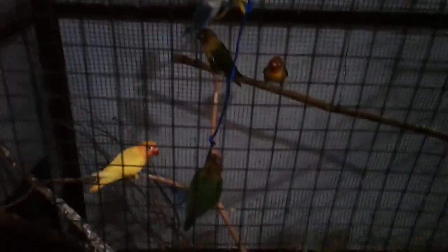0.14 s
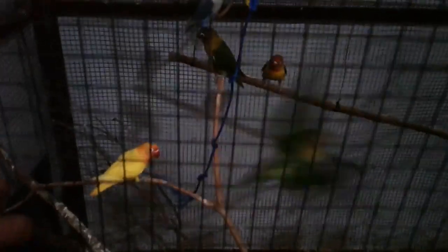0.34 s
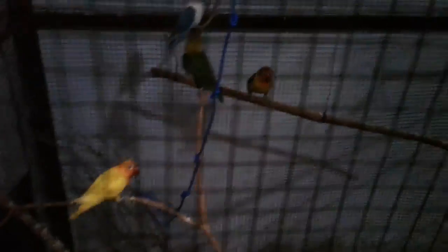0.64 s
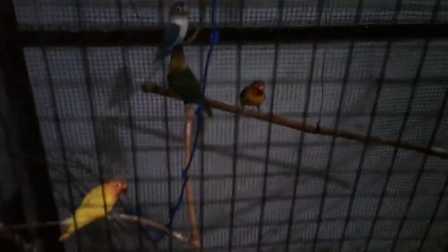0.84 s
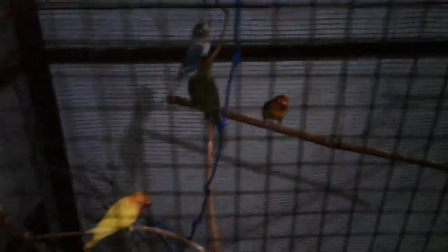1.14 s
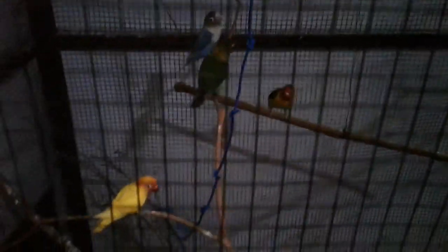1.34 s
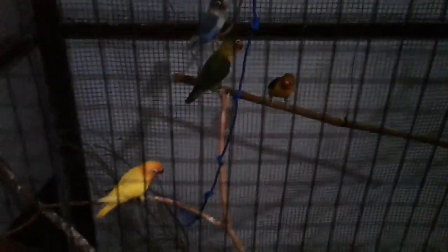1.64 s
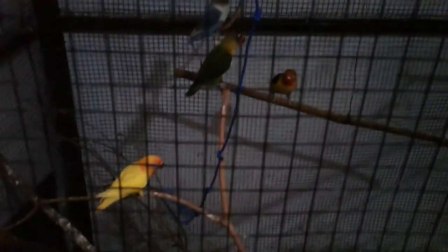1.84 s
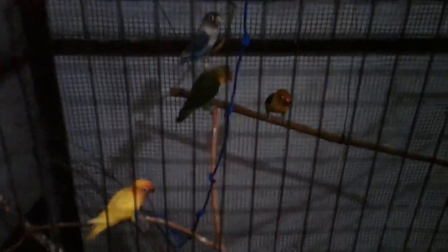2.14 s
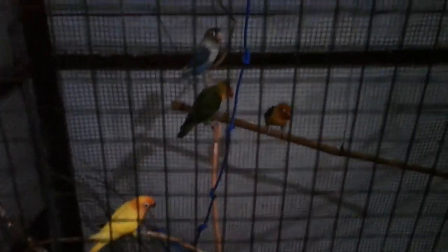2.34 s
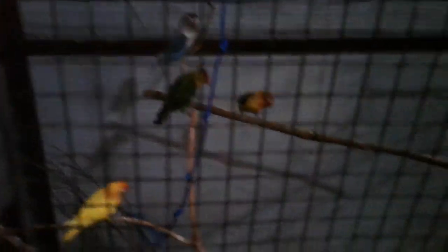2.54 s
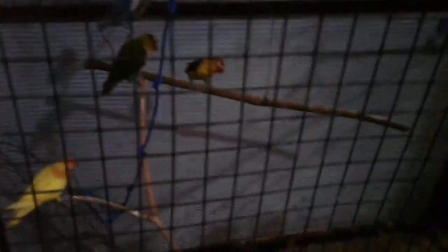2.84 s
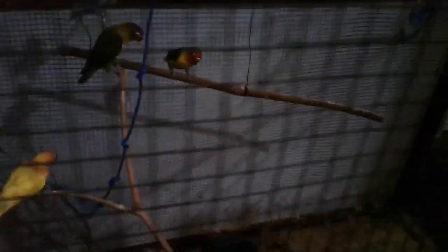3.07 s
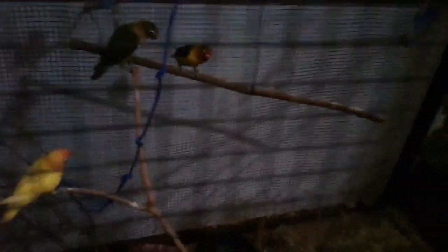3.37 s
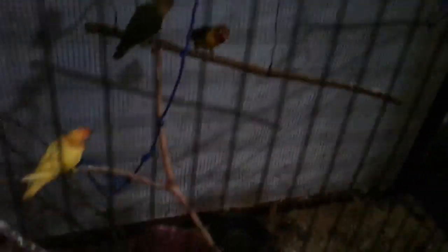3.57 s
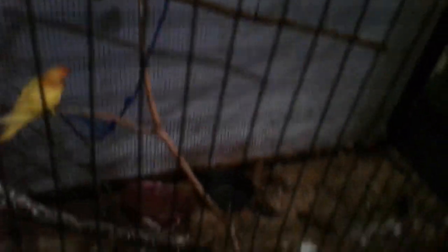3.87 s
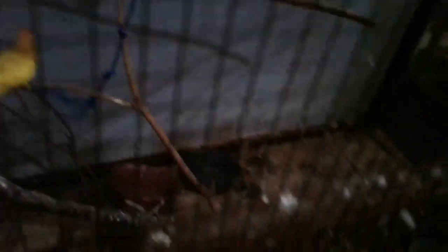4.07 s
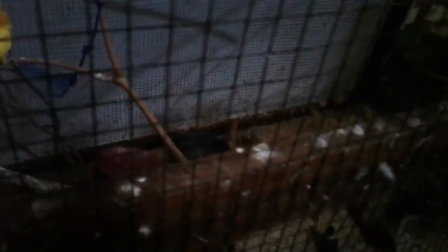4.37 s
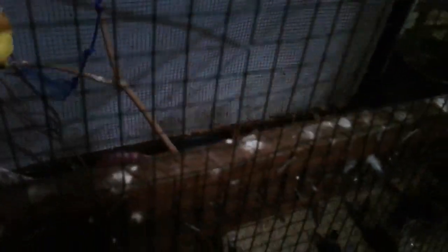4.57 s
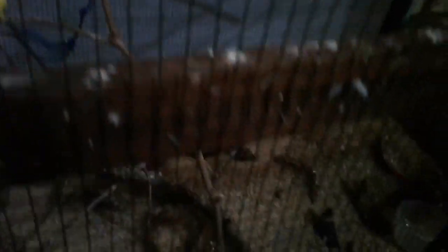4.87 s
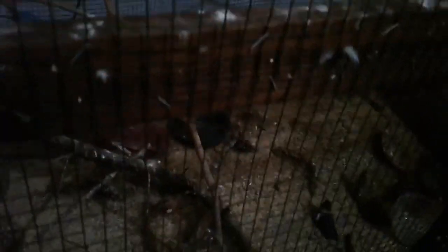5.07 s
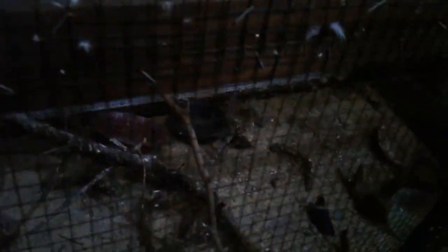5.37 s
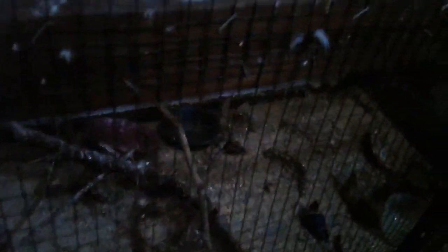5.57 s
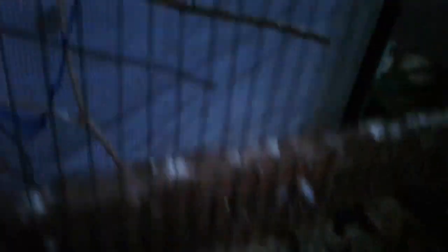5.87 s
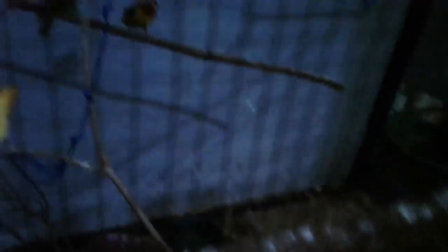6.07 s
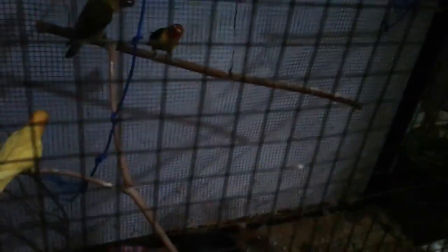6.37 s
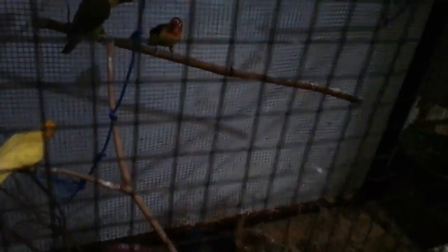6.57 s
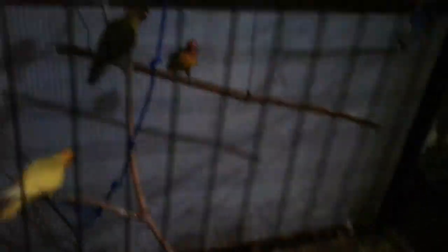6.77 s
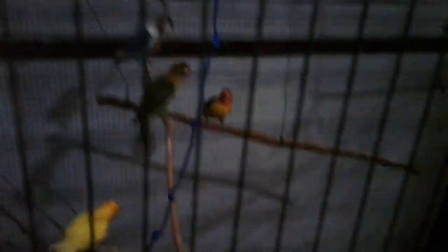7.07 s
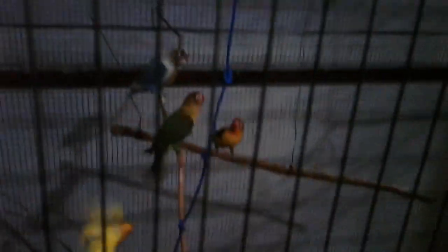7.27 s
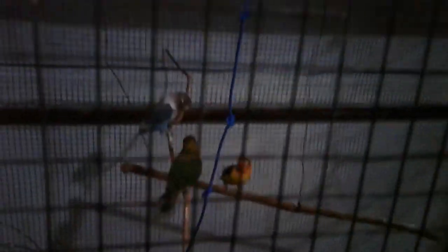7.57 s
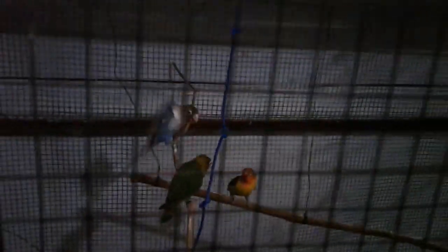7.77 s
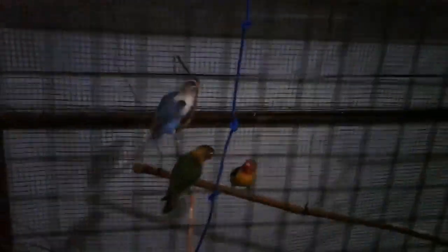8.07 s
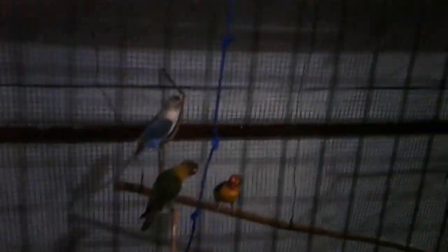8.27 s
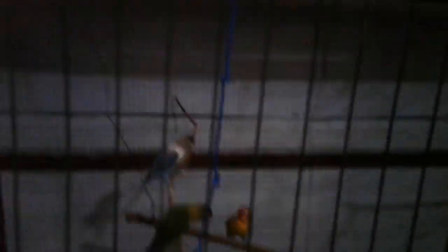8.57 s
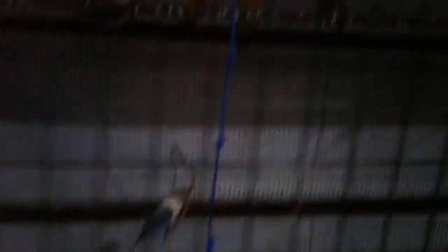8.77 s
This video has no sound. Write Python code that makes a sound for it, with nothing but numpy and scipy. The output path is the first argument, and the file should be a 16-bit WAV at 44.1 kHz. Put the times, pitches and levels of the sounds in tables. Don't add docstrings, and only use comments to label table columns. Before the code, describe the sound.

A few small parrots call a few metres from a phone in a bare-walled aviary that rings for about half a second. From 0 to 0.2 s come quick whistles and rasps, then faint far whistles; a second brief bout at 0.7-1.0 s overlaps a short wing flutter. Feet land on ringing wire around 1.3 s, with a light tick after, and one explosive squawk snaps at 1.8 s. A faint distant motor note sinks until 2.7 s over soft air and low rumble, while far birds squawk at 2.3-2.6 s. Piercing, buzzy high chirps follow from 2.4 to 5.4 s, singly or in close pairs. Two harsh climbing screeches sound at 5.7 and 6.15 s amid fast wingbeats. Chatter breaks out at 6.65-7.0 s, then runs densely from 7.2 s to the end near 9 s, gliding whistles and rasps tumbling together, with the strongest wing flapping around 8 s. Loud calls distort slightly.

```python
import sys
import numpy as np
from scipy import signal
from scipy.fft import rfft, irfft
from scipy.io import wavfile
from scipy.ndimage import uniform_filter1d, map_coordinates

SR = 44100
rng = np.random.default_rng(int(sys.argv[2]) if len(sys.argv) > 2 else 0)


def gain_from_decibels(decibels):
    exponent = np.asarray(decibels, float) / 20
    return 10 ** exponent


def to_wav(s):
    ch = np.atleast_2d(s).T
    pcm = np.round(np.clip(ch, -1, 1) * 32767)
    wavfile.write(sys.argv[1], SR, pcm.astype(np.int16))


N = 392931

# frequency in Hz, level in dB per Hz.
AIR_HZ_DB = [(40, -7.5), (200, -5), (500, -4.5), (1000, -6.5), (6000, -12), (7200, -35), (16000, -30)]
# time in seconds, level in dB.
RUMBLE_S_DB = [(0.0, -81), (0.59, -62), (2.2, -62), (2.7, -57), (3.6, -65), (5.2, -61), (5.6, -64),
               (7.58, -64.5), (8.01, -53.5), (8.4, -69), (8.9, -85)]
# time in seconds, pitch in Hz, level in dB.
MOTOR_S_HZ_DB = [
    (1.79, 440, -84),
    (1.82, 440, -68),
    (2.42, 395, -70),
    (2.75, 350, -84),
]
# frequency in Hz, 60 dB decay time in seconds.
ROOM_T60_HZ_S = [(500, 0.63), (3000, 0.43), (6000, 0.44), (12000, 0.3)]
# time in seconds, peak level in dB, ring in Hz.
LANDINGS = [
    (1.261, -32, 338),
    (1.271, -29, 293),
    (1.289, -30, 369),
    (1.39, -33, 1062),
    (1.573, -38, 346),
    (2.257, -36.5, 1173),
]
# frequency in Hz, level in dB per Hz.
RATTLE_HZ_DB = [(100, -22.5), (350, -12), (900, -6), (2500, -7), (5000, -18), (14000, -29)]
# start in seconds, end in seconds, beats per second, level in dB.
FLIGHTS = [
    (0.46, 1.004, 19.4, -55),
    (5.065, 5.327, 16.2, -60.5),
    (5.778, 6.38, 24, -54),
    (6.454, 6.592, 26, -53.5),
    (7.73, 8.2, 16, -47),
]
# frequency in Hz, level in dB per Hz.
WING_HZ_DB = [(40, -8.5), (110, -4), (300, -11.5), (600, -21.5), (1500, -24)]

# frequency in Hz, level in dB.
BEAK_HZ_DB = [(1700, -45.5), (2400, -5.5), (3500, 7), (6300, 1), (7300, -2.5), (10200, -15), (12300, -9),
              (16000, -20)]
# loudest partial in Hz, octave below in dB.
WINDPIPE_HZ_DB = [(3600, -30.5), (4600, -35), (5500, -15), (6200, -10.5)]
# warble in Hz, warble share of pitch, wander share of pitch, throb depth 0-1.
CLEAR = (150, .005, .009, .33)
HARSH = (250, .028, .036, .8)
BUZZY = (225, .017, .011, .75)
PURE_DB, FULL_DB, THIN_DB, RICH_DB, FAR_LOW_DB = -47.5, -13.5, -7.5, -9.5, 4

# start in seconds, length in seconds, from Hz, to Hz, level in dB.
FAR_SQUAWKS = [(2.327, 0.089, 6060, 5190, -40), (2.328, 0.11, 3900, 4210, -38.5),
               (2.33, 0.1, 4910, 5200, -41), (2.335, .075, 6760, 6500, -45.5),
               (2.47, 0.09, 5810, 5710, -40), (2.45, .08, 4330, 4470, -42.5),
               (2.52, 0.078, 3850, 4205, -36), (2.55, .075, 4550, 5030, -35),
               (2.58, 0.063, 5924, 5400, -41.5)]
FAR_FULL = [(.228, 0.2, 6010, 5650, -39), (.505, 0.069, 5865, 5590, -35), (2.348, 0.084, 5770, 5300, -43.5)]
FAR_PURE = [(2.154, 0.031, 6150, 5050, -49.5), (2.172, 0.056, 5200, 5600, -49.5),
            (.235, 0.22, 8850, 8550, -48)]
FAR_LOW = [(2.345, 0.078, 5600, 5230, -43), (2.45, 0.068, 6220, 5770, -50),
           (2.51, 0.078, 5480, 5275, -43.5)]

# start in seconds, from Hz, to Hz, level in dB, octave below in dB.
CHIRPS = [(2.409, 6270, 6210, -19, -1), (2.9762, 6477, 6230, -11, -5.5), (3.4554, 6530, 6090, -11, -10.5),
          (3.5617, 6680, 6075, -15, -4), (4.016, 6240, 6454, -13, -8.5), (4.1722, 5810, 6436, -13.5, -4.5),
          (4.7292, 6585, 6120, -12.5, -5.5), (4.867, 5800, 6090, -11, -11.5),
          (5.4066, 5803, 6077, -10, -13.5)]
# start in seconds, pitch in Hz, level in dB.
UNDERTONES = [(2.417, 5320, -20.5), (2.99, 5744, -17.5), (3.471, 5734, -13), (3.578, 5520, -15),
              (4.028, 5650, -21.5), (4.741, 5646, -14), (5.408, 5230, -18.5)]
# start in seconds, pitch in Hz, level in dB.
LEAD_INS = [(0.091, 3910, -24), (0.744, 4140, -18), (7.204, 4010, -22), (7.483, 3220, -26),
            (7.597, 3216, -25), (8.242, 3570, -19.5), (8.418, 3316, -24.5), (8.542, 3254, -19.5),
            (8.658, 3136, -21.5), (8.785, 3270, -20)]
# start in seconds, pitch factor, time stretch, level in dB.
SCREECHES = [
    (5.695, 1.01, .99, -14),
    (6.147, .98, 1.03, -14),
]
# delay in seconds, length in seconds, from Hz, to Hz, level in dB.
SCREECH_THIN = [
    (0.0, .045, 3227, 4463, -9.5),
]
SCREECH_FULL = [
    (.05, 0.022, 4520, 4774, -1.6),
    (.072, 0.0298, 4783, 4954, 0.52),
]
SCREECH_HARSH = [
    (.05, 0.0145, 3270, 3480, -11.5),
    (.09, .06, 5134, 5627, 0.4),
    (.1, 0.049, 3250, 3513, -23),
    (.105, 0.033, 6284, 6520, -6.5),
    (.142, .02, 5900, 5800, -0.5),
    (.155, 0.01, 3630, 3624, -8),
]
# start in seconds, length in seconds, from Hz, to Hz, level in dB.
SCREECH_ASIDES = [(5.729, 0.015, 4334, 4560, -13.5), (5.742, .014, 3200, 3470, -19),
                  (5.845, 0.019, 4550, 4300, -14), (5.765, 0.067, 3560, 3300, -26.5),
                  (6.158, .026, 5900, 6250, -27.5), (6.184, .012, 5150, 5500, -12.5),
                  (6.234, 0.0084, 5200, 5400, -17), (6.154, 0.032, 3400, 4250, -22),
                  (6.245, .052, 4950, 5550, -15), (6.21, .008, 5200, 5300, -15),
                  (6.304, 0.019, 4300, 4450, -20.5), (6.31, 0.017, 3400, 3800, -23)]
# start in seconds, length in seconds, pitch in Hz, level in dB.
RASPS = [(0.0, 0.011, 6090, -14), (.15, .022, 4820, -13.5), (.76, 0.03, 6610, -25), (4.218, .05, 5715, -12),
         (6.689, 0.012, 4170, -22.5), (6.703, 0.028, 5250, -13), (2.415, .028, 5810, -17),
         (5.408, 0.027, 5010, -21), (6.803, 0.0383, 3203, -17), (7.206, 0.019, 5940, -20.5),
         (7.214, 0.017, 6260, -15.5), (7.226, 0.01, 3330, -22), (7.318, 0.0185, 4390, -17),
         (7.344, 0.016, 5480, -19.5), (7.392, 0.019, 5940, -18), (7.41, 0.0189, 4866, -9),
         (7.507, 0.0082, 3290, -17), (7.638, 0.0052, 2956, -17.5), (7.826, 0.0137, 6870, -17.5),
         (7.826, 0.006, 5280, -14), (7.888, 0.02, 6150, -18), (7.988, 0.01, 6250, -12),
         (8.006, 0.018, 6400, -12.5), (8.028, 0.032, 4630, -20.5), (8.066, 0.025, 5160, -18),
         (8.158, 0.0099, 3600, -15), (8.255, 0.019, 3220, -22), (8.357, 0.034, 4780, -21),
         (8.45, .01, 5590, -18.5), (8.798, 0.027, 4950, -21), (8.825, 0.014, 4196, -15.5)]
# start in seconds, length in seconds, from Hz, to Hz, level in dB.
SQUAWKS = [(0.854, 0.027, 4960, 3296, -21.5), (1.778, 0.0052, 7220, 4343, -7.5),
           (2.411, 0.0055, 7130, 6500, -18), (4.171, 0.012, 5250, 5710, -16),
           (4.854, 0.016, 4650, 5980, -12.5), (5.403, 0.0094, 5000, 6660, -18),
           (0.801, 0.012, 6950, 6100, -25), (3.558, .006, 5160, 7220, -17),
           (4.219, 0.0087, 4800, 6300, -13), (6.691, 0.021, 4540, 5280, -11),
           (6.764, 0.037, 4656, 3300, -13.5), (6.803, 0.054, 6400, 5856, -14),
           (6.831, .022, 4586, 5196, -11.5), (6.876, 0.012, 5746, 6400, -16),
           (7.201, 0.05, 4166, 6240, -19.5), (7.379, 0.0103, 3960, 4300, -15.5),
           (7.384, 0.011, 4150, 6330, -16), (7.49, 0.0159, 2403, 3520, -30.5),
           (7.527, 0.0089, 3000, 6870, -15), (7.884, 0.0255, 5295, 4915, -11.5),
           (7.986, 0.022, 4376, 5590, -7), (8.477, 0.0133, 5336, 6580, -12.5),
           (8.568, 0.0057, 3430, 5640, -6.5), (8.593, .034, 5660, 7160, -15),
           (8.68, 0.023, 3805, 3983, -15), (8.717, 0.0099, 4920, 6340, -11.5),
           (8.729, 0.007, 6140, 5920, -13), (8.847, 0.02, 5580, 6055, -16.5)]
# start in seconds, length in seconds, pitch in Hz, level in dB.
PURE_HOLDS = [(.03, 0.026, 2604, -25.5), (.138, 0.026, 3147, -21), (.827, 0.024, 3723, -14.5),
              (.778, 0.026, 2746, -21.5), (5.325, .016, 6090, -31.5), (6.884, 0.014, 6480, -17),
              (.962, 0.0084, 4266, -11.5), (.968, 0.015, 3056, -21.5), (.978, 0.017, 5067, -8.5),
              (6.947, 0.0224, 3480, -19.5), (6.971, 0.0063, 3390, -12), (6.98, 0.0075, 3380, -18),
              (7.236, .028, 4220, -8.5), (7.266, 0.017, 6690, -19), (7.362, 0.0286, 3604, -16),
              (7.8, .038, 3100, -25), (8.402, .008, 5450, -11), (8.409, 0.017, 4810, -11),
              (8.472, 0.043, 2990, -34), (8.574, 0.032, 3050, -20), (8.778, .01, 2990, -26.5),
              (8.383, 0.019, 2057, -29), (7.432, 0.016, 4904, -13.5), (7.641, 0.0084, 4850, -7.5),
              (7.65, 0.0093, 5130, -8), (7.771, 0.006, 5440, -8), (8.158, 0.023, 4150, -13.5),
              (8.27, .015, 3750, -15), (8.318, 0.0078, 3770, -8.5), (8.333, 0.025, 3554, -11),
              (8.368, 0.0305, 3650, -19), (8.552, 0.0087, 4530, -16.5), (8.579, 0.018, 4040, -15.5),
              (8.668, 0.0077, 5770, -10), (8.755, 0.02, 4200, -11)]
RICH_HOLDS = [(.782, .028, 5310, -27), (4.82, 0.036, 6150, -9.5), (5.323, .016, 4027, -27),
              (6.755, 0.021, 5036, -13), (7.615, 0.021, 4040, -23.5), (7.804, 0.0197, 6250, -8.5),
              (8.286, 0.0076, 5670, -11), (8.47, 0.036, 5990, -22.5), (8.598, 0.019, 6250, -21),
              (8.712, 0.02, 5860, -20), (8.845, 0.016, 5740, -15.5)]
FULL_HOLDS = [(.1, 0.052, 5850, -29.5), (.719, 0.044, 6080, -37.5), (.95, 0.017, 5850, -20.5),
              (6.674, 0.0223, 4510, -13.5), (6.722, 0.043, 4817, -12), (6.793, 0.011, 6220, -16),
              (7.777, 0.013, 6470, -13), (8.13, 0.02, 5264, -11), (8.146, 0.014, 6290, -11.5),
              (8.258, 0.025, 4644, -17.5), (8.292, 0.016, 4830, -8.5), (8.562, 0.0092, 6770, -12),
              (8.776, 0.005, 6050, -19)]
# start in seconds, length in seconds, from Hz, to Hz, level in dB.
PURE_GLIDES = [(.006, 0.028, 4143, 3760, -13), (0.104, 0.041, 3346, 3800, -20.5),
               (0.154, .006, 3150, 4810, -19.5), (0.817, 0.012, 4900, 3890, -14),
               (0.851, 0.012, 5870, 5500, -17.5), (0.94, 0.024, 3650, 4430, -18.5),
               (3.565, 0.0097, 4010, 3300, -20), (4.728, 0.0068, 4540, 3380, -17.5),
               (6.657, 0.018, 3423, 3980, -23.5), (6.864, 0.013, 5300, 5850, -7),
               (6.779, .007, 4370, 4000, -13), (6.79, .009, 4100, 3400, -18),
               (7.853, .026, 6504, 6570, -10.5), (6.937, 0.0092, 1710, 3430, -28.5),
               (7.263, 0.008, 4460, 6860, -7), (7.278, 0.038, 6750, 4210, -9),
               (7.319, 0.012, 3930, 2030, -25.5), (7.35, 0.0138, 2870, 3470, -20.5),
               (7.389, 0.0213, 3510, 3004, -20), (7.514, 0.0195, 4440, 3980, -14),
               (7.535, 0.017, 4720, 5344, -9.5), (7.61, 0.0103, 2140, 3360, -25.5),
               (7.841, 0.018, 5540, 3280, -12), (7.879, .007, 4010, 5600, -8),
               (7.885, .012, 5460, 5200, -8.5), (7.956, 0.04, 3850, 4225, -14),
               (8.038, 0.034, 3805, 3445, -13.5), (8.1, 0.012, 3590, 3420, -17),
               (8.116, .014, 4210, 4045, -10), (8.179, 0.009, 4710, 5020, -6.5),
               (8.186, .01, 5350, 5780, -8.5), (8.201, .019, 4970, 5240, -12.5),
               (8.28, 0.022, 4240, 4386, -14.5), (8.442, 0.013, 3430, 3670, -18.5),
               (8.455, .02, 4430, 4010, -13), (8.629, 0.0101, 5810, 4080, -13),
               (8.637, 0.031, 4160, 3410, -13), (8.671, 0.013, 3025, 5660, -13),
               (8.358, 0.0353, 2570, 2000, -29.5), (8.7, 0.0066, 5450, 4000, -14.5),
               (8.75, 0.0045, 5980, 4280, -5.5), (8.783, 0.024, 4760, 5700, -10),
               (8.806, 0.025, 3464, 3656, -18.5)]
FULL_GLIDES = [(0.77, .013, 4465, 5540, -10.5), (4.013, 0.0077, 7250, 6050, -21.5),
               (4.811, .007, 5320, 5570, -10.5), (7.339, 0.023, 6850, 6080, -18.5),
               (7.634, 0.0102, 5040, 6210, -15), (7.764, 0.0095, 4240, 4660, -21),
               (7.783, 0.019, 5280, 6110, -7), (8.076, 0.024, 3450, 3770, -23),
               (8.557, 0.005, 4620, 6800, -10), (8.57, 0.021, 5314, 6450, -15)]
SNAP = [
    (1.778, .012, 3900, 3980, -18.5),
    (1.776, 0.013, 5950, 5850, -17),
    (1.777, 0.012, 2350, 1920, -27),
    (1.775, 0.0092, 2900, 4000, -22.5),
]

# time in seconds, peak level in dB.
POPS = [(3.482, -26), (3.486, -17.5), (4.24, -28.5), (4.255, -25), (4.759, -25), (4.871, -24),
        (4.882, -29.5), (5.446, -32), (6.236, -32), (6.289, -29.5), (6.818, -29), (6.83, -28), (6.84, -28),
        (6.846, -29), (6.854, -27), (6.871, -22.5), (7.828, -30.5), (8.003, -24.5), (8.016, -25)]


def on_log(hz, points):
    points = np.array(points)
    return np.interp(np.log(hz + 1), np.log(points[:, 0]), points[:, 1])


def coloured(points, size):
    gain = gain_from_decibels(on_log(np.fft.rfftfreq(size, 1 / SR), points))
    x = irfft(rfft(rng.standard_normal(size)) * gain, size)
    return x / np.std(x)


def walk(rate_hz, size):
    k = int(SR / rate_hz)
    steps = np.repeat(rng.standard_normal(size // k + 1), k)
    return 1.382 * uniform_filter1d(uniform_filter1d(steps, k), k)[:size]


def add(out, x, start_s):
    i = int(start_s * SR)
    out[i:i + len(x)] += x[:N - i]


def rumble():
    spectrum = [(60, -18), (160, 4), (400, 3.5), (800, -16.0), (2000, -20.0)]
    level_db = np.interp(np.arange(N) / SR, *np.transpose(RUMBLE_S_DB)) + 2.2 * walk(6, N)
    return gain_from_decibels(level_db) * coloured(spectrum, N)


def motor():
    t = np.arange(N) / SR
    s, hz, db = np.transpose(MOTOR_S_HZ_DB)
    pitch_hz = np.interp(t, s, hz) * (1 + 0.018 * walk(59, N))
    level_db = np.interp(t, s, db, left=-120, right=-120) + 10.5 + 1.5 * walk(24, N)
    return gain_from_decibels(level_db) * np.sin(2 * np.pi * np.cumsum(pitch_hz) / SR)


def background():
    air = gain_from_decibels(-62.5) * coloured(AIR_HZ_DB, N)
    whine = gain_from_decibels(-78 + 2.5 + 2.5 * walk(30, N)) * np.sin(2 * np.pi * 15625 * np.arange(N) / SR)
    return air + rumble() + motor() + whine


def walls():
    rise_s, early_fade_s, early_db = 0.008, 0.015, 4
    t = np.arange(int(.7 * SR)) / SR
    edges_hz = 200 * 2 ** np.arange(0, 6.6, .5)
    tail = np.zeros(len(t))
    for lo, hi in zip(edges_hz, edges_hz[1:]):
        band = signal.butter(2, (lo, hi), "band", fs=SR, output="sos")
        decay = np.exp(-np.log(1000) * t / on_log(lo * 1.55, ROOM_T60_HZ_S))
        tail += signal.sosfilt(band, rng.standard_normal(len(t))) * decay
    tail *= 1 - np.exp(-t / rise_s)
    slaps = np.zeros(len(t))
    slaps[rng.integers(50, 1000, size=40)] = rng.standard_normal(size=40)
    slaps *= np.exp(-t / early_fade_s)
    return tail / np.linalg.norm(tail) + gain_from_decibels(early_db) * slaps / np.linalg.norm(slaps)


def feet():
    out, t = np.zeros(N), np.arange(SR // 10) / SR
    for s, db, hz in LANDINGS:
        ring = .5 * np.sin(2 * np.pi * hz * t) * np.exp(-t / 0.0051)
        rattle = 0.23 * coloured(RATTLE_HZ_DB, len(t)) * np.exp(-t / 0.013)
        add(out, gain_from_decibels(db) * (ring + rattle), s)
    return out


def wings():
    t, churn, swish = np.arange(N) / SR, np.zeros(N), np.zeros(N)
    for start_s, end_s, rate_hz, db in FLIGHTS:
        aloft = gain_from_decibels(db) * np.clip(np.minimum(t - start_s, end_s - t) / 0.074 + 0.33, 0, 1)
        since_stroke_s = (rate_hz * (t - start_s)) % 1 / rate_hz
        churn += aloft * (1 + .5 * np.cos(2 * np.pi * rate_hz * since_stroke_s))
        swish += aloft * (np.exp(-since_stroke_s / .006) + .03)
    uneven = gain_from_decibels(2 * walk(8.4, N))
    return uneven * (churn * coloured(WING_HZ_DB, N) + gain_from_decibels(9.0) * swish * coloured(RATTLE_HZ_DB, N))


def calls(notes, manner, attack_s, release_s, breath_db, swell_s=0.0025, opens=0.47, upper_db=0.5,
          wander_hz=700, most_odd_db=-2.5, wakes_s=.0001):
    warble_hz, depth, wander, throb = manner
    out, airflow = np.zeros(N), np.zeros(N)
    drift = walk(wander_hz, N + SR)
    starts = rng.uniform(0, 2 * np.pi, (len(notes), 2))
    for (s, length_s, hz0, hz1, db, sub_db), (start, skip) in zip(notes, starts):
        t = np.arange(int((length_s + release_s) * SR)) / SR
        chance = drift[int(skip * N / 7):][:len(t)]
        beat = start + 2 * np.pi * warble_hz * t + 1.6 * chance
        glide_hz = hz0 + (hz1 - hz0) * np.minimum(t / length_s, 1)
        hz = glide_hz * (1 + depth * np.sin(beat) + wander * chance) / 2
        phase = 2 * np.pi * np.cumsum(hz) / SR
        low = gain_from_decibels(sub_db) * np.clip(2 * hz / np.mean(hz) - 1, 0, 1.3) ** 2 * np.sin(phase)
        tone = np.sin(2 * phase)
        for k in np.arange(3, 9):
            odd_db = min(sub_db + 9.5, most_odd_db) * (k % 2)
            beak_db = np.minimum(on_log(k * hz, BEAK_HZ_DB) - on_log(2 * hz, BEAK_HZ_DB), 0)
            fall_db = -1 * (k - 2)
            audible = k * hz < .45 * SR
            tone += gain_from_decibels(beak_db + fall_db + odd_db + upper_db) * audible * np.sin(k * phase)
        tone = low + np.clip(0.25 + t / wakes_s, 0, 1) * tone
        swell = opens + (1 - opens) * np.clip(t / swell_s, 0, 1)
        fade = np.clip((t[-1] - t) / (2 * release_s), 0, 1)
        level = gain_from_decibels(db) * np.clip(t / attack_s, 0, 1) * swell * fade * (1 + throb * np.cos(beat))
        add(out, level * tone, s)
        add(airflow, level * (1 + 0.69 * np.exp(-t / 0.0019)), s)
    return out + gain_from_decibels(breath_db) * airflow * coloured(BEAK_HZ_DB, N)


def voiced(glides, sub_db):
    if np.isscalar(sub_db):
        return [(*g, sub_db) for g in glides]
    return [(*g, on_log(np.mean(g[2:4]), sub_db)) for g in glides]


def held(rows):
    out = []
    for s, length_s, hz, db in rows:
        creep = .03 if 4150 < hz < 5250 else -0.019
        out.append((s, length_s, hz * (1 - creep), hz * (1 + creep), db))
    return out


def screech(stages):
    return [(s + after_s * stretch, length_s * stretch, a * pitch, b * pitch, db + more_db)
            for s, pitch, stretch, db in SCREECHES for after_s, length_s, a, b, more_db in stages]


def far_birds():
    squawking = calls(voiced(FAR_SQUAWKS, WINDPIPE_HZ_DB), HARSH, 0.00087, 0.0052, breath_db=-15.0)
    notes = voiced(FAR_FULL, FULL_DB) + voiced(FAR_PURE, PURE_DB) + voiced(FAR_LOW, FAR_LOW_DB)
    whistling = calls(notes, CLEAR, 0.0017, 0.0058, breath_db=-38.5)
    cut = signal.butter(5, 2150, "high", fs=SR, output="sos")
    return signal.sosfilt(cut, squawking + whistling)


def chirps():
    upper = [(s, .044, a, b, db, low_db) for s, a, b, db, low_db in CHIRPS]
    under = [(s, 0.033, hz, hz * 1.06, db) for s, hz, db in UNDERTONES]
    return (calls(upper, BUZZY, 0.0012, 0.0077, breath_db=-56, swell_s=0.016, opens=0.5, wander_hz=250,
                  wakes_s=0.017)
            + calls(voiced(under, PURE_DB), BUZZY, 0.0029, .006, breath_db=-56, wander_hz=250, upper_db=2))


def openings():
    lead_ins = [(s, 0.015, hz, hz * 1.2, db) for s, hz, db in LEAD_INS]
    return calls(voiced(lead_ins + screech(SCREECH_THIN), THIN_DB), BUZZY, .003, 0.0017, breath_db=-25,
                 swell_s=0.026, opens=0.43, upper_db=-7)


def screeches():
    notes = voiced(screech(SCREECH_FULL), RICH_DB) + voiced(SCREECH_ASIDES, PURE_DB)
    return calls(notes, BUZZY, 0.0018, 0.0074, breath_db=-21, upper_db=-5)


def squawks():
    notes = voiced(held(RASPS) + SQUAWKS + screech(SCREECH_HARSH), WINDPIPE_HZ_DB)
    return calls(notes, HARSH, 0.0025, 0.0039, breath_db=-20)


def whistles():
    notes = voiced(held(PURE_HOLDS) + PURE_GLIDES + SNAP, PURE_DB)
    notes += voiced(held(RICH_HOLDS), RICH_DB)
    notes += voiced(held(FULL_HOLDS) + FULL_GLIDES, FULL_DB)
    return calls(notes, CLEAR, 0.00052, 0.0044, breath_db=-25, most_odd_db=-11)


def scene():
    room_db, whistle_room_db = -7.5, -3
    stir = .00007 * SR * walk(30, N)
    whistling = whistles()
    near = squawks() + openings() + screeches() + chirps() + wings() + feet()
    far = far_birds()
    into_room = gain_from_decibels(room_db) * (near + gain_from_decibels(whistle_room_db) * whistling) + far
    echo = signal.fftconvolve(into_room, walls())[:N]
    echo = map_coordinates(echo, [np.arange(N) + stir], mode="mirror")
    return (whistling + near + 0.43 * far + echo + background())[None]


def top_cut(x):
    return signal.sosfilt(signal.butter(12, 16460, fs=SR, output="sos"), x)


def record(dry):
    bent = 0.61 * np.tanh(dry / 0.76)
    mud = signal.sosfilt(signal.butter(1, (110, 1400), "band", fs=SR, output="sos"), bent ** 4)
    pops, t = np.zeros(N), np.arange(-88, 88) / SR
    for s, db in POPS:
        add(pops, gain_from_decibels(db + 2.0) * np.exp(-(t / 0.00027) ** 2), s + t[0])
    bent = bent - .15 * mud - pops
    bent = signal.sosfilt(signal.ellip(8, .2, 60, 15800, fs=SR, output="sos"), bent)
    mix = signal.sosfilt(signal.butter(1, 90, "high", fs=SR, output="sos"), bent)
    return top_cut(mix)


dry = scene()
out = record(dry)
to_wav(out)
```